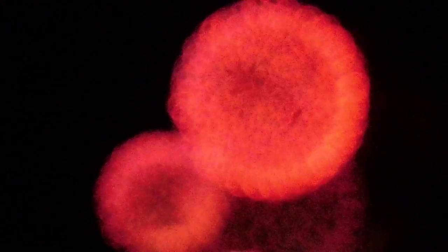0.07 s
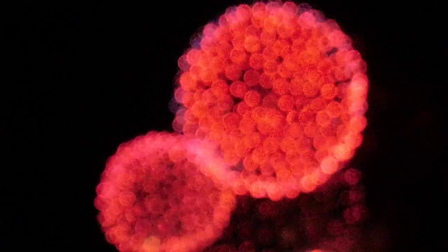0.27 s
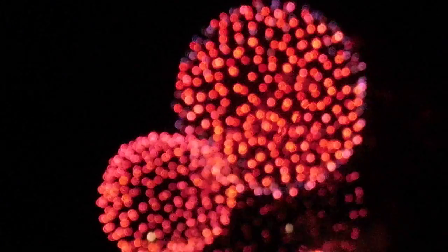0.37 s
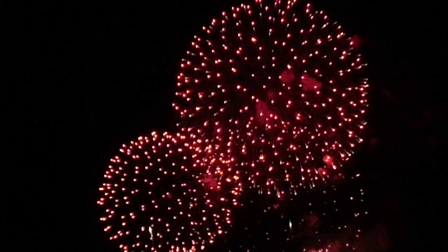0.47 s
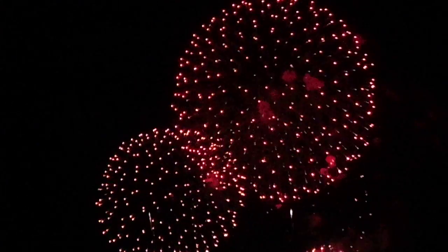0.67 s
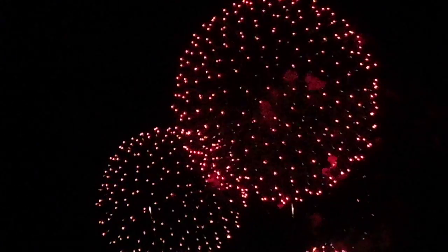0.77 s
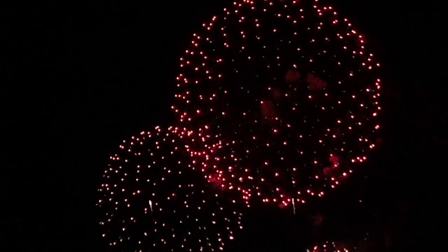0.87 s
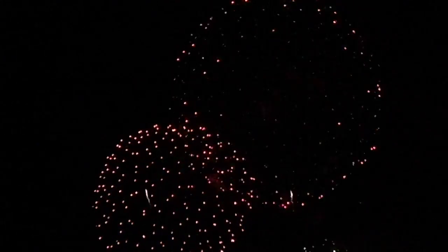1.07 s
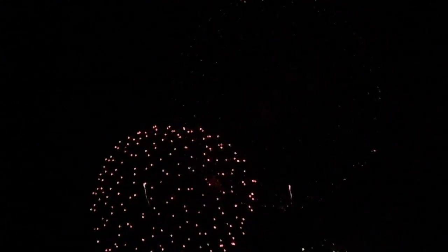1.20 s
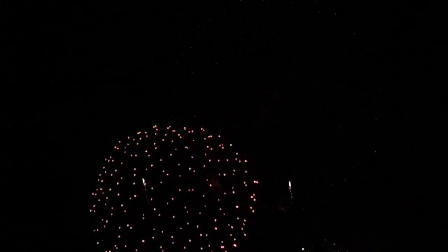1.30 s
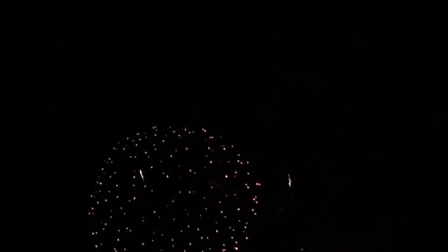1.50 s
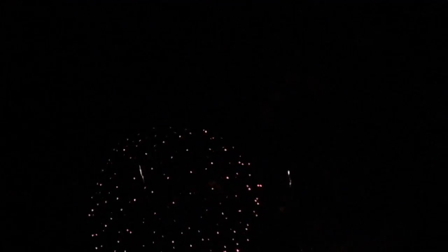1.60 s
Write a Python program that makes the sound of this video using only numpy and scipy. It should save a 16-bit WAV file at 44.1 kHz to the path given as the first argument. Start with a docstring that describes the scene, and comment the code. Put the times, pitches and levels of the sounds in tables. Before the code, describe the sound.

Three deep firework booms with rolling echoes and faint far pops in open air.

```python
"""An open field at night: three large firework shells boom, with smaller, farther pops between and after.
Each boom is a pressure wave with dull echoes, a bright crack, scattered sound and a rolling tail.
Each pop is a hollow knock with an echo. Reflections make the booms and some pops ring briefly.
Under them lies the even wash of the grounds. At first a small motor, likely a lens focusing,
buzzes faintly as it takes quick little steps."""
import sys
import numpy as np
from scipy import signal
from scipy.fft import rfft, irfft, next_fast_len
from scipy.io import wavfile
from scipy.ndimage import uniform_filter1d

SR = 44100
rng = np.random.default_rng(int(sys.argv[2]) if len(sys.argv) > 2 else 0)


def waveform_to_disk(signal):
    """Save audio, clipped to [-1, 1], as 16-bit WAV at the path in sys.argv[1]."""
    frames = np.transpose(np.atleast_2d(signal))
    scaled = np.clip(frames, -1, 1) * 32767
    samples = np.round(scaled).astype(np.int16)
    wavfile.write(sys.argv[1], SR, samples)


N = 72765
T = np.arange(N) / SR

# Tone of the grounds and microphone hiss: frequency_hz, relative_db
WASH_TONE = [(20, -13.5), (50, 14), (100, -5.5), (200, -4), (400, -11.5), (700, -17), (1300, -14),
             (2200, -19), (3000, -28.5), (4200, -33), (7000, -38), (15500, -38.5)]
# When the motor runs: first_step_s, last_step_s, level_db
MOTOR_STEP_RUNS = [(0.0167, .408, -56.5), (0.438, .461, -55.5)]
# Tone of the motor's rasp: frequency_hz, relative_db
RASP_TONE = [(1500, -1.5), (3000, -6.5), (4100, -6.5), (4500, -4.5), (5500, -4.5), (6800, -14), (7900, -21),
             (8800, -19), (10300, -15), (13000, -21), (15500, -27)]
# Notes of the motor's housing: pitch_hz, level_db
HOUSING_NOTES = [(3680, -73), (4510, -66), (5000, -69), (5420, -66.5), (6800, -80), (7790, -71)]
# Large shells: time_s, wave_db, dip_s, push_s, dip_db, rebound_db, front_rise_s, echo_db, crack_db,
# scatter_db, tail_db. The levels after wave_db turn single parts up or down.
BIG_SHELLS = [(0.25, -3.5, .0040, 0.0054, -1.5, -15, 0.00043, -3.5, 4.5, 0, 2),
              (.8000, -5.5, 0.0046, 0.0059, -9, -8, 0.0015, -1, -7, -2.5, -1.5),
              (1.2466, -3, 0.0045, 0.005, -4.5, -6, 0.002, -2, -6.5, -3.5, -2.5)]
# Echoes off large surfaces nearby: delay_s, relative_db, dull_above_hz
NEARBY_ECHOES = [(.0130, -3.5, 130), (.0258, 4.5, 70.5), (.0432, 8.5, 38.1), (.0650, 2.5, 43),
                 (.0770, -12, 300), (.0980, -15, 250), (.1180, -14.5, 179), (.1420, -3.5, 51.3),
                 (.1610, -12.5, 70)]
# Tone of the crack, the bright spray at the wave's front: frequency_hz, relative_db
CRACK_TONE = [(100, -9), (400, 2), (750, 8.5), (1050, 6.5), (1800, 5), (2500, -3), (3400, -14), (4500, -34),
              (8000, -34.5), (16000, -35)]
# Tone of sound scattered off the ground and things on it: frequency_hz, relative_db
SCATTER_TONE = [(40, 5.5), (120, -2.5), (230, -1.5), (400, -4), (650, -17.5), (1200, -22), (2200, -39.5),
                (4000, -65), (16000, -80)]
# Tone of the rolling tail: frequency_hz, relative_db
TAIL_TONE = [(20, -6.5), (48, 8.5), (75, 4), (115, -1.5), (200, -5.5), (400, -17), (800, -22), (1800, -35),
             (3500, -47), (16000, -85)]
# How long the tail lasts: frequency_hz, fade_s (a fade time is the time to drop by 60 dB)
TAIL_FADES = [(40, 0.66), (120, 3.32), (400, 3.8), (1500, 0.83), (6000, 0.85)]
# Hollow notes in the booms and pops: start_s, pitch_hz, level_db, rise_s, fade_s
HOLLOW_NOTES = [(0.267, 44.7, -12, 0.018, .4), (0.301, 104.2, -25, 0.057, .2),
                (.25, 238.4, -34, 0.0056, 0.1), (.715, 384.5, -34.5, 0.0051, 0.19),
                (.715, 458.4, -36.5, .008, 0.21), (0.802, 197, -30.5, 0.0019, 0.26),
                (.80, 453, -30, 0.0071, 0.093), (.80, 602, -36, 0.001, 0.18),
                (1.005, 449, -34.5, 0.0073, 0.14), (1.241, 235.7, -19, 0.0032, 0.19),
                (1.242, 387, -23, 0.0019, 0.2), (1.243, 711, -31, 0.0012, 0.038),
                (1.242, 1140, -29.5, .001, .02), (1.31, 110, -26.5, 0.038, 0.72)]
# Far pops: start_s, level_db, pitch_hz, rise_s, snap_offset_db, smear_offset_db, smear_fade_s
FAR_POPS = [(0.5009, -25, 223, 0.0013, -10, -7.5, 0.25), (.7130, -28.5, 164, 0.0054, -14, -2.5, 0.14),
            (1.0038, -24, 321, 0.0052, -20.5, -13, 0.073), (1.0873, -33.5, 261, 0.006, -17, -4, 0.15),
            (1.509, -41, 227, 0.0021, -25, -17, 0.26), (1.6230, -29, 99, 0.0091, -28, -21, .2)]


def amp(db):
    """Turns decibels into a number to multiply by."""
    return 10 ** (np.asarray(db) / 20)


def look_up(table, hz):
    """Reads between a table's rows, with octaves evenly spaced."""
    row_hz, value = np.transpose(table)
    return np.interp(np.log(hz + 1), np.log(row_hz), value)


def add(mix, start_s, sound):
    """Mixes a sound in at a given time."""
    part = mix[max(round(start_s * SR), 0):][:len(sound)]
    part += sound[:len(part)]


def noise(gain):
    """Noise of average power 1, with its tone set by gain(hz)."""
    size = next_fast_len(N)
    hz = np.fft.rfftfreq(size, 1 / SR)
    random_phases = np.exp(2j * np.pi * rng.random(len(hz)))
    hiss = irfft(gain(hz) * random_phases, size)[:N]
    return hiss / np.sqrt(np.mean(hiss ** 2) + 1e-20)


def shaped_noise(tone):
    """Noise that follows a tone table."""
    return noise(lambda hz: amp(look_up(tone, hz)))


def noise_band(centre_hz, octaves):
    """Noise that is strongest around one pitch."""
    return noise(lambda hz: np.exp(-.5 * (np.log2((hz + 1) / centre_hz) / octaves) ** 2))


def fade(t, fade_s):
    """Dies away by 60 dB every fade_s seconds."""
    return np.exp(-np.log(1000) * t / fade_s)


def burst(rise_s, fade_s):
    """A loudness shape: a straight rise, then a fade."""
    return np.minimum(T / rise_s, 1) * fade(np.maximum(T - rise_s, 0), fade_s)


def wash():
    """The grounds and the microphone make a soft, steady noise."""
    return amp(-42.5) * shaped_noise(WASH_TONE)


def motor():
    """Each step of the motor is a short, thin rasp that rings its housing."""
    steps_per_s, width_s, lead_s, jitter_s = 48.6, .0034, .0071, .0002
    rasp_level, whine = np.zeros(N), np.zeros(N)
    notes = sum(amp(db) * np.sin(2 * np.pi * hz * T) for hz, db in HOUSING_NOTES)
    ring = notes * burst(rise_s=.0018, fade_s=.081)
    for first_s, last_s, db in MOTOR_STEP_RUNS:
        for step_s in np.arange(first_s, last_s + .5 / steps_per_s, 1 / steps_per_s):
            rasp_level += amp(db) * np.exp(-.5 * ((T - step_s) / width_s) ** 2)
            add(whine, step_s - lead_s + rng.normal(0, jitter_s), ring)
    return rasp_level * shaped_noise(RASP_TONE) + whine


def pressure_wave(dip_s, push_s, dip_db, rebound_db, front_s, echo_db):
    """Air pressure dips, jumps steeply into a push and rebounds; dull echoes follow."""
    size, air_hz, bass_cut_hz = 16384, 3300, 8.7
    t = T[:size] - dip_s  # zero at the steep front
    progress = np.clip(t / np.where(t < 0, dip_s, push_s), -1, 1)
    wave = np.tanh(t / front_s) * np.cos(np.pi / 2 * progress) * np.where(t < 0, amp(dip_db), 1)
    wave -= amp(rebound_db) * np.sin(np.pi * np.clip(t / push_s - 1, 0, 1))
    hz = np.fft.rfftfreq(size, 1 / SR)
    echoes = sum(amp(db) * np.exp(-2j * np.pi * hz * delay_s) / (1 + (hz / dull_hz) ** 2)
                 for delay_s, db, dull_hz in NEARBY_ECHOES)
    air = 1 / (1 + (hz / air_hz) ** 6)  # the air soaks up the treble
    bass_cut = 1j * hz / (bass_cut_hz + 1j * hz)
    return irfft(rfft(wave) * (1 + amp(echo_db) * echoes) * air * bass_cut, size)


def click(tone):
    """A sharp click of peak 1 that follows a tone table."""
    hz = abs(np.fft.fftfreq(2048, 1 / SR))
    log_gain = np.log(amp(look_up(tone, hz)))
    spectrum = np.exp(np.conj(signal.hilbert(log_gain)))  # packs the energy at the start
    pulse = np.fft.ifft(spectrum).real
    return pulse / abs(pulse).max()


def tail():
    """Distant reflections swell and die away, each pitch at its own speed."""
    rise_s = .067
    hz, t, bands = signal.stft(shaped_noise(TAIL_TONE), SR, nperseg=1024, noverlap=768)
    bands *= fade(t, look_up(TAIL_FADES, hz)[:, None])
    rolling = signal.istft(bands, SR, nperseg=1024, noverlap=768)[1][:N]
    return rolling * np.minimum(T / rise_s, 1) ** 2


def shells():
    """Each large shell bursts: a pressure wave, a click in a bright spray, scatter and a tail."""
    click_lag_s = .001117
    out = np.zeros(N)
    for (time_s, wave_db, dip_s, push_s, dip_db, rebound_db, front_s,
         echo_db, crack_db, scatter_db, tail_db) in BIG_SHELLS:
        start_s = time_s - dip_s
        wave = pressure_wave(dip_s, push_s, dip_db, rebound_db, front_s, echo_db)
        spray = shaped_noise(CRACK_TONE) * burst(rise_s=.00071, fade_s=.11)
        scatter = shaped_noise(SCATTER_TONE) * burst(rise_s=.0038, fade_s=.32)
        add(out, start_s, amp(wave_db) * wave)
        add(out, time_s + click_lag_s, amp(crack_db - 24) * click(CRACK_TONE))
        add(out, start_s, amp(crack_db - 33.5) * spray)
        add(out, start_s, amp(scatter_db - 22) * scatter)
        add(out, time_s, amp(tail_db - 28.5) * tail())
    return out


def hollow_rings():
    """Closely spaced reflections give the booms and some pops short, hollow notes."""
    out = np.zeros(N)
    for start_s, hz, db, rise_s, fade_s in HOLLOW_NOTES:
        add(out, start_s, amp(db) * np.sin(2 * np.pi * hz * T) * burst(rise_s, fade_s))
    return out


def pops():
    """Small far bursts: a hollow knock and its echo, a weak snap and a smear of reflections."""
    echo_s, echo_db = .01342, -1
    out = np.zeros(N)
    for start_s, db, hz, rise_s, snap_db, smear_db, smear_fade_s in FAR_POPS:
        knock = amp(db) * np.sin(2 * np.pi * hz * T) * burst(rise_s, fade_s=.034)
        snap = amp(db + snap_db) * noise_band(centre_hz=880, octaves=.67) * burst(rise_s, fade_s=.047)
        smear = amp(db + smear_db) * noise_band(hz, octaves=.71) * burst(rise_s, smear_fade_s)
        add(out, start_s, knock + snap + smear)
        add(out, start_s + echo_s, amp(echo_db) * knock)
    return out


def scene():
    """All the sounds meet at one microphone."""
    return (shells() + hollow_rings() + pops() + wash() + motor())[None]


def record(dry):
    """The recorder cuts off the very highest treble."""
    cutoff_hz = 15780
    treble_cut = signal.firwin(701, cutoff_hz, window=("kaiser", 9), fs=SR)
    return signal.oaconvolve(dry, treble_cut[None], "same")


dry = scene()
out = record(dry)
waveform_to_disk(out)
```